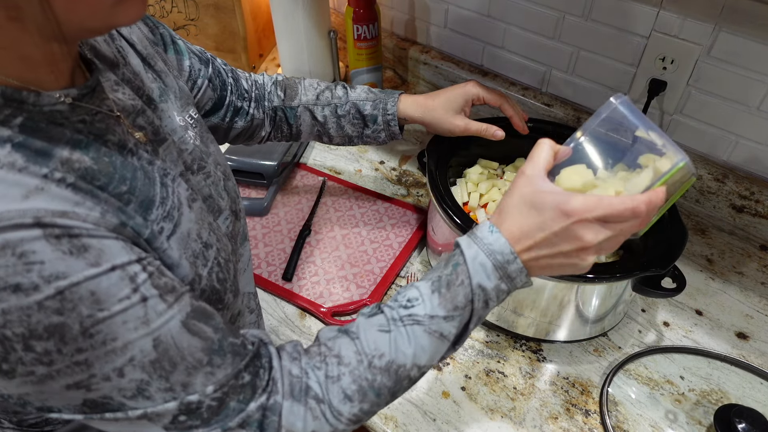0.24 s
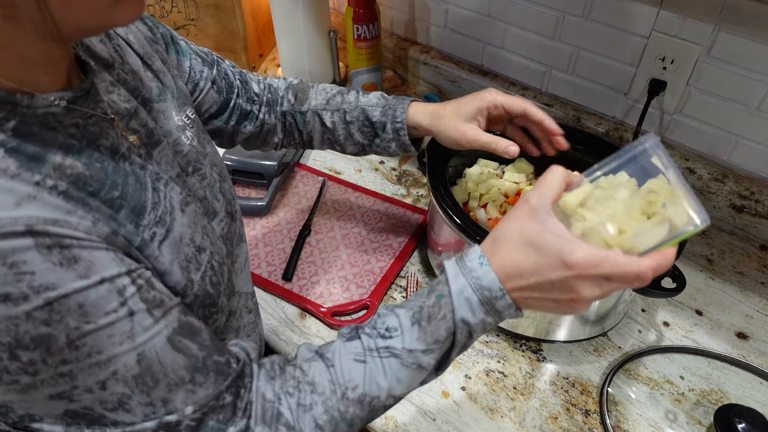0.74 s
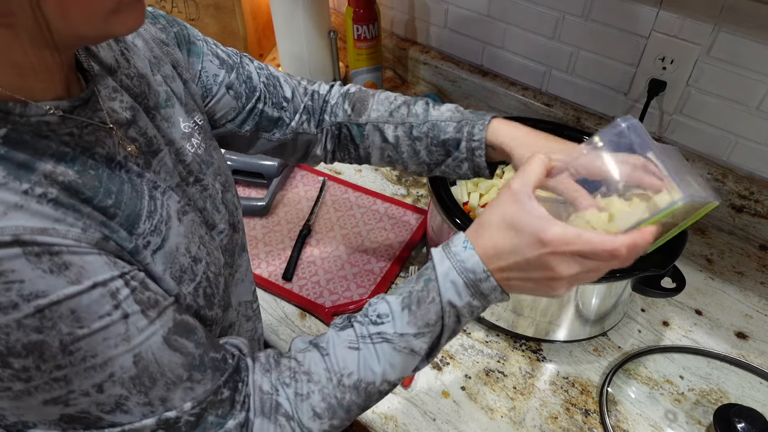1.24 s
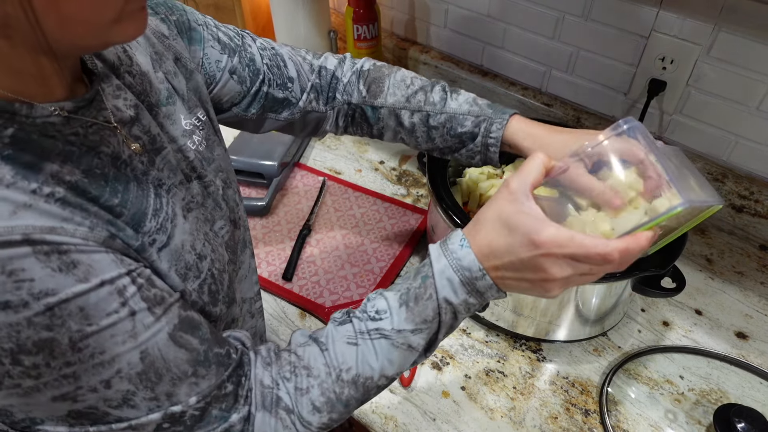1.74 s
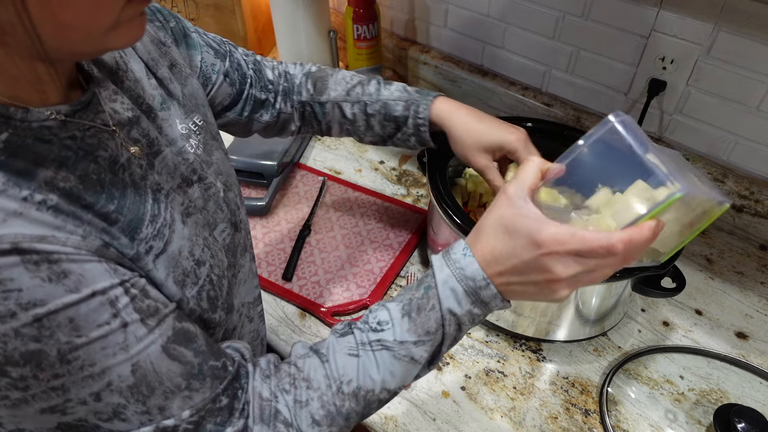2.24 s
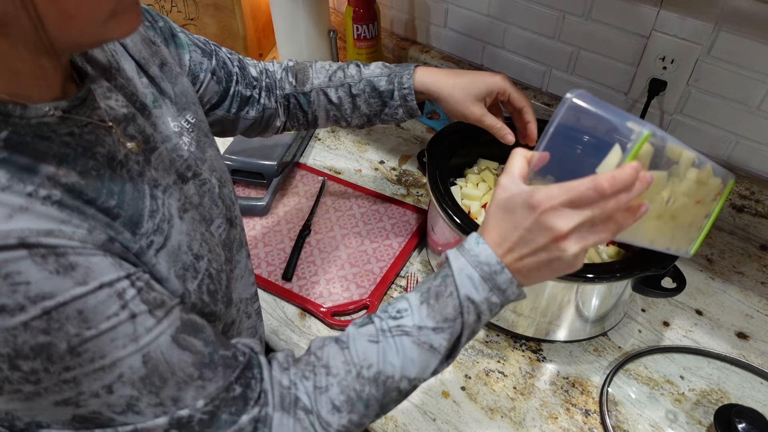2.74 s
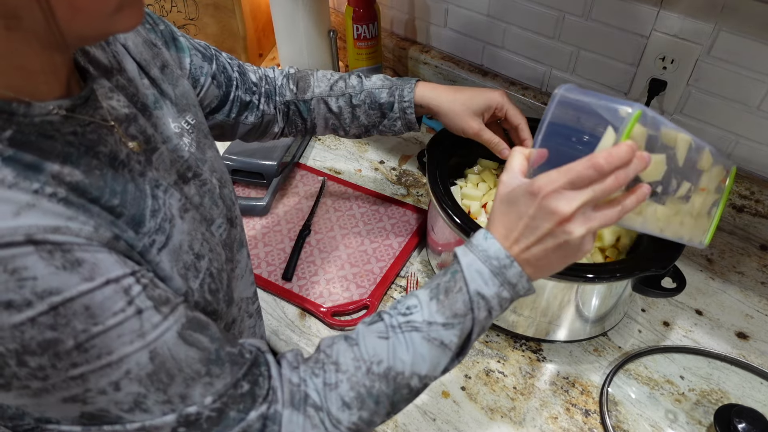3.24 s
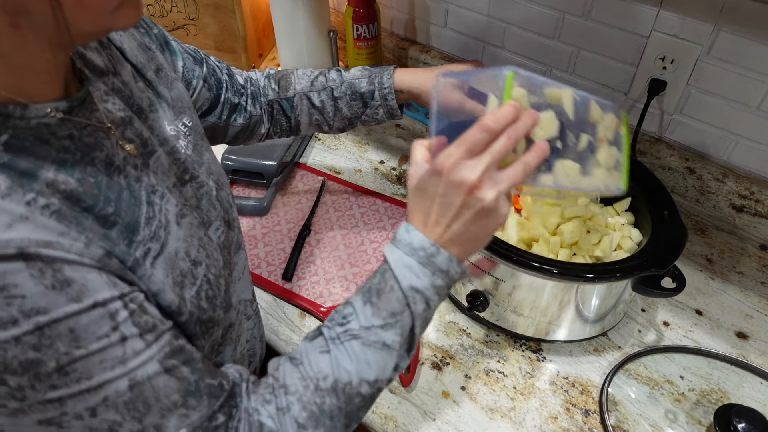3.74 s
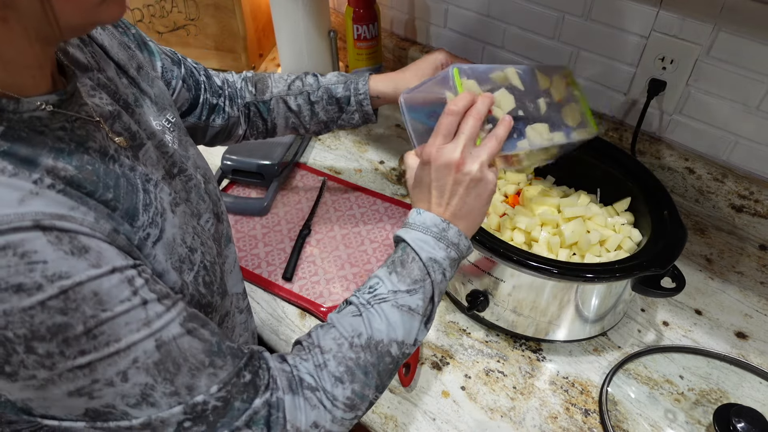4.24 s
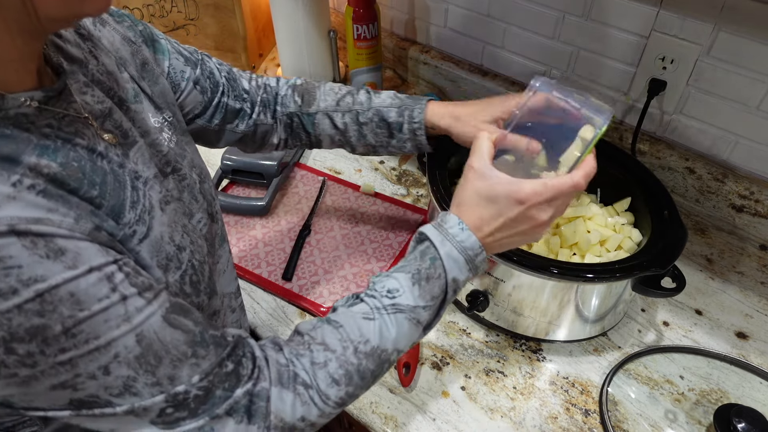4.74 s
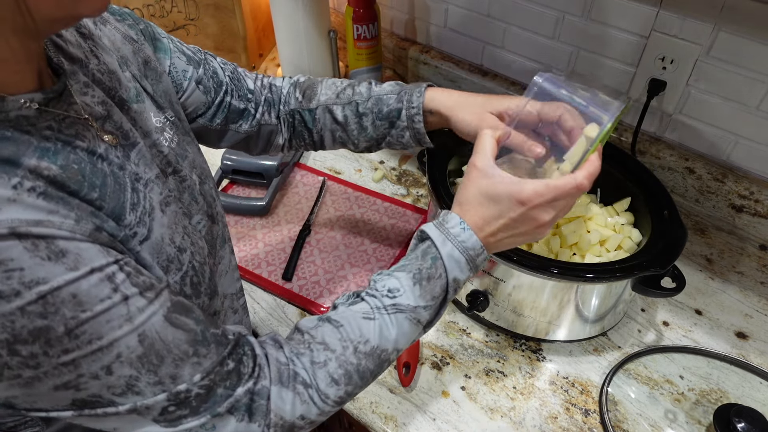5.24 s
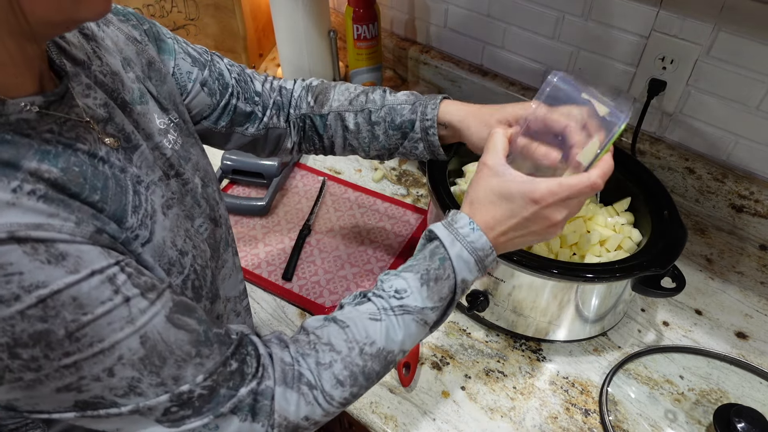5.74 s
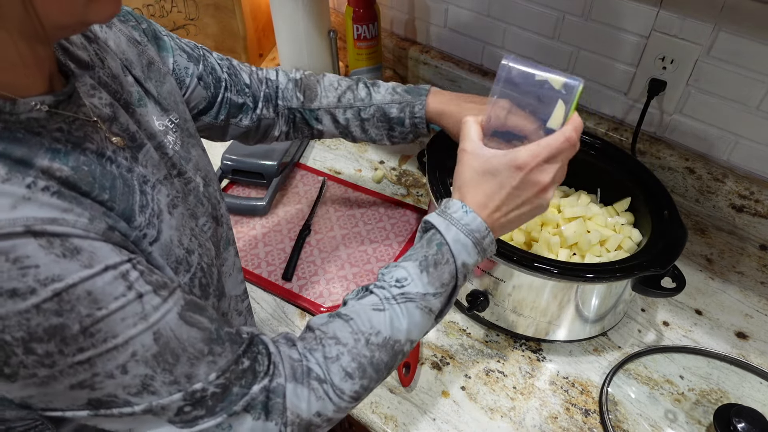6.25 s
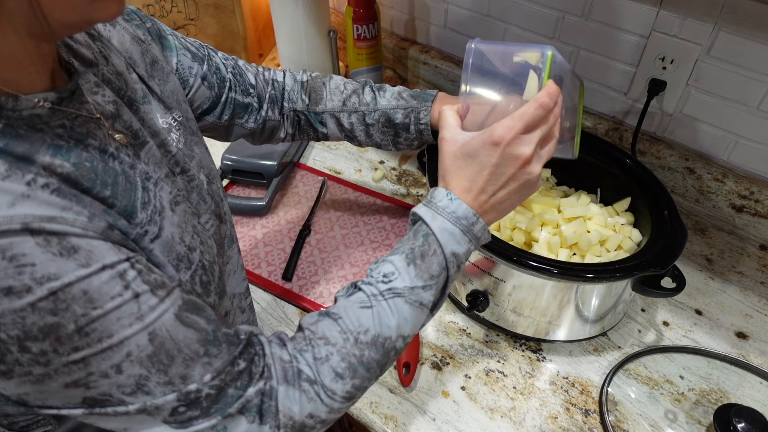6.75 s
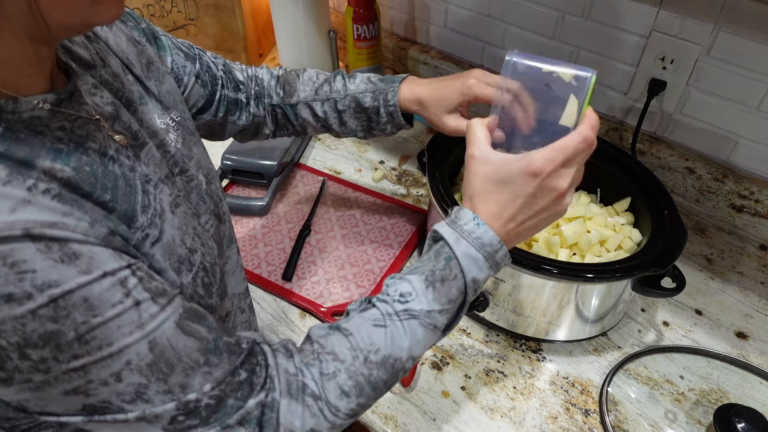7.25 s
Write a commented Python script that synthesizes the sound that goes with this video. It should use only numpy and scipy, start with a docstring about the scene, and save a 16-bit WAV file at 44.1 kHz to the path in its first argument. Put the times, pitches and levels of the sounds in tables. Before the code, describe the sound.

Hollow plastic knocks and soft, sticky rustling as potato cubes are emptied by hand from a box into a kitchen pot.

```python
"""Diced potato knocks and tumbles in a plastic box shaken over a pot; fingers scrape the last cubes out.
Each impact excites damped modes of the air in the box, its walls and its rim, and a tiled kitchen
reverberates. Wet cubes tick as they let go; sliding friction hisses and gripping skin squeaks.
Behind it all an appliance hums, air rushes and a low rumble comes and goes."""
import sys
import numpy as np
from scipy import signal
from scipy.fft import rfft, irfft, next_fast_len
from scipy.io import wavfile
from scipy.ndimage import map_coordinates

SR = 44100
rng = np.random.default_rng(int(sys.argv[2]) if len(sys.argv) > 2 else 0)


def dump(signal):
    """Clip the signal to [-1, 1] and save it as 16-bit WAV at the path in sys.argv[1]."""
    limited = np.clip(np.atleast_2d(signal).T, -1, 1)
    pcm = np.round(limited * 32767).astype(np.int16)
    wavfile.write(sys.argv[1], SR, pcm)


N = 330750


def amp(db):
    return 10 ** (np.asarray(db) / 20)


def unit(x):
    return x / np.sqrt(np.mean(x ** 2) + 1e-20)


def along(points, hz):
    """Interpolation of (frequency, value) points on a logarithmic axis."""
    f, v = np.transpose(points)
    return np.interp(np.log(hz + 1), np.log(f + 1), v)


def curves(rows):
    """Linear interpolation in time: one envelope for each column after the first."""
    s, *cols = np.transpose(rows)
    return [np.interp(np.arange(N) / SR, s, c) for c in cols]


def wobble(rate):
    """Random modulation: a spline through `rate` Gaussian knots a second."""
    return map_coordinates(rng.standard_normal(int(N * rate / SR) + 4), [np.arange(N) * rate / SR])


def filtered(x, response):
    """Linear filtering: the spectrum of x times a frequency response."""
    n = x.shape[-1]
    m = next_fast_len(n + 8192)
    return irfft(rfft(x, m) * response(np.fft.rfftfreq(m, 1 / SR)), m)[..., :n]


def stereo_noise(spectrum, coherence, grain=1):
    """Partial coherence: independent mid and side noises, modulated by grain, mix to rms 1."""
    def response(hz):
        angle = np.arccos(np.clip(along(coherence, hz), -1, 1)) / 2
        return amp(along(spectrum, hz)) * [np.cos(angle), np.sin(angle)]
    mid, side = filtered(grain * rng.standard_normal((2, N)), response)
    return unit(np.array([mid + side, mid - side]))


# Tones of the appliance: (frequency [Hz], level [dB])
HUM_TONES = [(119.5, -68), (395, -63.5)]
# Envelope of the rumble: (time [s], level [dB])
RUMBLE_LEVELS = [(0.0, -80), (0.04, -64), (0.23, -74), (0.88, -74), (1.27, -63), (1.38, -73), (2.36, -59),
                 (2.53, -80), (2.76, -57), (2.9, -74), (3.13, -62), (4.22, -73.5), (4.43, -65), (5.43, -82),
                 (6.5, -70), (7.5, -82)]
# Spectrum of the rushing air: (frequency [Hz], spectral density [dB])
AIR_SPECTRUM = [(35, -56), (60, -40), (149, -12), (227, -6.5), (281, -7.5), (398, -3.5), (427, -14.5),
                (469, -8), (732, -20.5), (1440, -22), (2470, -31), (3340, -34), (3940, -35), (5090, -37.5),
                (16000, -43)]
# Likeness of the rush in left and right: (frequency [Hz], coherence [ratio])
AIR_COHERENCE = [(60, 0.85), (150, 0.64), (500, 0.9), (1600, 0.14), (5000, 0.064), (8000, 0.7),
                 (11000, .998)]
def kitchen(air_db=-55):
    """Superposition: broadband air noise, a hum modulated in level and phase, and a low rumble."""
    t = np.arange(N) / SR
    hum = sum(amp(db + 2.8 * wobble(7.3)) * np.sin(2 * np.pi * hz * t + 0.51 * wobble(7.2))
              for hz, db in HUM_TONES)
    bass = [(25, -70), (36, -20), (48, 0), (65, -7), (80, -13), (105, -8), (140, -25), (220, -80)]
    rumble = stereo_noise(bass, coherence=[(50, .98)])
    air = amp(air_db + 0.8 * wobble(4.05)) * stereo_noise(AIR_SPECTRUM, AIR_COHERENCE)
    return air + hum + amp(curves(RUMBLE_LEVELS)[0] + 0.46 * wobble(2.42)) * rumble


# Faint rough squeaks: (time [s], level [dB], time to fall 20 dB [s], frequency [Hz])
SQUEAKS = [(0.25, -60.5, 0.079, 1500), (0.38, -67, 0.25, 1480), (0.46, -54.5, 0.18, 1450),
           (0.6, -69, .2, 1550), (0.76, -70.5, 0.23, 3350), (0.8, -64, 0.17, 1600),
           (0.88, -54.5, 0.094, 1545), (0.89, -59.5, 0.073, 3170), (0.955, -67, .06, 3130),
           (1.06, -66, .05, 3430), (1.96, -60, .1, 1500), (2.11, -60, 0.089, 1880), (4.314, -65, .04, 3300),
           (4.43, -66, 0.12, 3200), (6.97, -55, .05, 2860), (5.3, -57, 0.14, 1920)]
def squeaks(rise_s=0.053, width_hz=160):
    """Stick-slip friction: skin on the gripped plastic excites narrow noise bands at its resonances."""
    t = np.arange(N) / SR
    a, b = (unit(filtered(rng.standard_normal(N), lambda f: np.exp(-(f / width_hz) ** 2)))
            for _ in range(2))
    out = np.zeros(N)
    for s, db, fade_s, hz in SQUEAKS:
        envelope = amp(db - 1.5 - 20 * np.maximum((s - t) / rise_s, (t - s) / fade_s))
        out += envelope * (a * np.sin(2 * np.pi * hz * t) + b * np.cos(2 * np.pi * hz * t))
    return out


def crackle(per_s=1100, centre_hz=4800, octaves=2.6, spread_db=2.5):
    """Shot noise: a wet film lets go in short tone bursts of random time, pitch and size; rms 1."""
    when, pitch, size = rng.random((int(per_s * N / SR), 3)).T
    hz = np.clip(centre_hz * 2 ** (octaves * (pitch - .5)), 1500, 15000)[:, None]
    k = np.arange(SR // 70)
    strength = amp(-spread_db * np.log(size + .02))[:, None] * (4000 / hz) ** 1.8
    pops = strength * np.hanning(len(k)) * np.sin(2 * np.pi * hz * k / SR)
    samples = (when * N).astype(int)[:, None] + k
    return unit(np.bincount(samples.ravel(), pops.ravel())[:N])


def settling(relative_db=-24, t60=0.36, rise_s=0.018):
    """Incoherent addition: the jostling after each knock sums in power to one amplitude envelope."""
    power, t = np.zeros(N + SR), np.arange(SR) / SR
    for s, db, *_ in KNOCKS:
        jostle = amp(db + relative_db - 60 * t / t60) * (1 - np.exp(-t / rise_s))
        power[round(s * SR):][:SR] += jostle ** 2
    return np.sqrt(power[:N])


# Envelopes of the sliding: (time [s], tumble level [dB], hiss level [dB])
SLIDE_LEVELS = [(0.0, -60, -70), (0.21, -56, -72.5), (0.77, -64, -73), (1.15, -57, -65), (1.33, -69, -57),
                (1.63, -55, -66), (1.86, -55.5, -68.5), (2.21, -49, -64), (2.46, -58.5, -71),
                (2.86, -60.5, -73.5), (3.26, -50.5, -67), (3.99, -65, -72), (4.55, -52.5, -70.5),
                (4.8, -53, -69.5), (4.89, -47.5, -63), (5.02, -56, -67), (5.09, -54, -60.5),
                (5.33, -55.5, -68.5), (5.58, -55, -60.5), (5.74, -56, -60.5), (5.87, -55, -57.5),
                (6.04, -52.5, -59), (6.25, -55, -65), (6.62, -61, -71.5), (6.72, -67, -56),
                (6.85, -56, -61.5), (6.97, -56, -59.5), (7.08, -54.5, -64.5), (7.2, -58, -71.5),
                (7.33, -63, -74.5), (7.4, -61, -64.5), (7.5, -51, -63)]
# Spectrum of jostling cubes: (frequency [Hz], spectral density [dB])
TUMBLE_SPECTRUM = [(60, -38), (130, -6), (200, -4), (400, -4.5), (550, 2.5), (800, 0.5), (1200, -7),
                   (1600, -3.5), (2200, -15.5), (3500, -28.5), (6000, -46)]
# Spectrum of wet skin on plastic: (frequency [Hz], spectral density [dB])
HISS_SPECTRUM = [(1200, -13), (2500, 5), (3500, 3), (6000, 1), (9000, -6), (12000, -12.5), (16000, -14.5)]
def slide(film_db=-1.5):
    """Friction noise: small cubes jostle in coarse lumps; wet skin on plastic hisses in fine grains."""
    tumble_db, hiss_db = curves(SLIDE_LEVELS)
    lumps = amp(2.5 * wobble(60))
    tumble = stereo_noise(TUMBLE_SPECTRUM, [(100, 0.84), (500, 0.79), (2000, 0.81)], lumps)
    grains = amp(0.63 * wobble(200) + 2.5 * wobble(25))
    hiss = stereo_noise(HISS_SPECTRUM, [(3000, 0.91), (7000, 1.0), (11000, .998)], grains)
    wet_hiss = hiss + amp(film_db) * crackle()
    return np.hypot(amp(tumble_db), settling()) * tumble + amp(hiss_db) * wet_hiss


# Decay of the tiled kitchen: (frequency [Hz], reverberation time T60 [s])
ROOM_T60 = [(200, 0.29), (600, 0.48), (2000, 0.39), (5000, 0.44), (12000, 0.062)]
# Difference between left and right in the room: (frequency [Hz], side over mid amplitude [ratio])
ROOM_WIDTH = [(200, 0.057), (1000, 0.25), (4000, 0.13), (9000, 0.094), (14000, .04)]
def reverberation(sound):
    """Convolution with a diffuse tail: noise in which each frequency decays at its own rate."""
    hz, t, noise = signal.stft(rng.standard_normal((2, SR // 2)), SR, nperseg=256)
    mid, side = noise * amp(-60 * t / along(ROOM_T60, hz)[:, None])
    side = side * along(ROOM_WIDTH, hz)[:, None]
    tail = signal.istft(np.array([mid + side, mid - side]), SR, nperseg=256)[1]
    delayed = np.pad(sound, (220, 0))  # 5 ms
    return signal.fftconvolve(delayed[None], tail / np.linalg.norm(tail[0]), axes=1)


# Spectrum common to all ticks: (frequency [Hz], spectral density [dB])
TICK_SPECTRUM = [(1500, -1.5), (3000, 8), (6000, 1.5), (10000, -6), (13000, -18), (16000, -20)]
# Sticky ticks: (time [s], peak level [dB], tail T60 [s], lower resonance [Hz], its strength [dB],
# upper resonance [Hz], its strength [dB], tilt [dB/octave])
TICKS = [(0.0203, -31.5, 0.18, 3700, 6.7, 5510, 4.7, -4), (1.0084, -44.5, 0.15, 3190, 3.4, 7020, 2, 3),
         (1.06, -48, 0.13, 3380, 5, 5640, 3, 1), (1.1462, -33, 0.32, 3370, 6.6, 5490, 3.1, 0.5),
         (1.2695, -36, 0.23, 3460, 10, 6340, 3.5, -1), (1.43, -44.5, 0.1, 3470, 4.2, 6390, 2, 8),
         (1.4544, -52, 0.14, 3030, 5, 8560, 4, 9), (1.496, -46, 0.15, 4210, 3.6, 6170, 2, 5),
         (1.783, -52.5, 0.13, 4700, 4.3, 8600, 2, 8), (1.879, -57, 0.12, 4010, 5, 5660, 6, 0),
         (1.9604, -50, 0.12, 3010, 4.1, 5890, 2, 3), (2.0223, -48.5, 0.14, 3120, 4.1, 5880, 4.3, 3),
         (2.0702, -38.5, 0.072, 3420, 6, 5900, 6, -5.5), (2.089, -50.5, 0.3, 3370, 4.6, 5870, 4, 8),
         (2.1857, -45, 0.074, 3530, 6.9, 6600, 6, -3), (2.2184, -47, 0.065, 3600, 4.5, 6700, 3, 8),
         (2.2704, -36, 0.23, 3420, 6.9, 6400, 3.2, -4), (3.054, -50, 0.2, 2950, 3.6, 5250, 2, 4),
         (3.1128, -50, 0.23, 3030, 4.2, 5280, 2, 4), (3.1363, -47, 0.12, 3690, 4, 5260, 2, 4),
         (3.152, -44, 0.25, 4800, 5.8, 7290, 4, 2.5), (3.2276, -38, 0.19, 3530, 5.6, 7260, 2, -1.5),
         (3.899, -56.5, 0.12, 5010, 4.6, 5330, 3, -3.5), (4.3108, -49, 0.34, 3350, 6, 9600, 6.9, 8),
         (4.5223, -33, 0.25, 3200, 9.4, 5260, 2.1, -1), (4.835, -50, 0.12, 3200, 5, 5630, 7, -4),
         (4.8482, -41, 0.26, 3300, 3.7, 6200, 2, 0.5), (4.882, -39, 0.14, 3460, 5, 6240, 6, -4),
         (4.8993, -43.5, 0.14, 3420, 5, 6000, 6, -3), (4.9472, -40, 0.17, 3080, 3.8, 6440, 2, -1.5),
         (5.043, -50, 0.18, 4980, 5, 6430, 5.3, -3), (5.0649, -43.5, 0.17, 4970, 5, 5720, 4.3, 0),
         (5.1166, -43.5, 0.11, 4350, 6.5, 5770, 4.8, -3), (5.211, -53, 0.19, 3170, 3.9, 7650, 3, 4),
         (5.275, -54, 0.12, 4110, 4.3, 8570, 13, 4), (5.3812, -41.5, 0.056, 3540, 7.2, 5100, 10, -4),
         (5.457, -40, 0.086, 3060, 5.4, 5370, 6, -2), (5.578, -48, 0.16, 3400, 4.1, 5310, 2, -2),
         (5.664, -44, 0.062, 4250, 7.2, 5960, 5.4, -2), (5.791, -47, 0.068, 3480, 5, 5690, 6, -3),
         (5.852, -47, 0.069, 3480, 5, 6070, 8, 0), (5.8843, -35, 0.11, 3510, 8.4, 5200, 3.3, 0),
         (5.8968, -38.5, 0.078, 3670, 5, 6000, 5.4, 5), (6.0544, -51, 0.14, 3480, 5, 5960, 6, 3),
         (6.172, -51, 0.12, 4130, 5, 5650, 6, -2), (6.1968, -45, 0.091, 4090, 5, 6050, 5, 2.5),
         (6.506, -48.5, 0.13, 3820, 10, 5900, 5.6, 1), (6.636, -27, 0.18, 3820, 2.7, 6660, 2.8, -0.5),
         (6.6482, -34, 0.1, 3720, 5, 6700, 3.2, 6), (6.6603, -28, 0.13, 3820, 4.1, 6260, 8.6, 1),
         (6.678, -35.5, 0.28, 3770, 5, 6200, 7, 2), (6.736, -39.5, 0.14, 3650, 5, 6170, 3, -1),
         (6.8242, -43.5, 0.15, 3170, 7.3, 5800, 3.3, 4), (6.8836, -43, 0.06, 3750, 5, 5890, 4.6, 0),
         (6.943, -58, 0.29, 4350, 4.1, 5850, 10, 3), (7.0192, -35.5, 0.072, 2940, 2.9, 6200, 3.4, -1),
         (7.3467, -37, 0.21, 3850, 12, 5920, 4.2, -1.5), (7.3548, -39, 0.11, 3070, 5, 5500, 6, -2)]
def ticks(half_width_hz=260):
    """Release of adhesion: a wet cube lets go in a bright noise burst with two resonance peaks."""
    out, t = np.zeros((2, N + SR)), np.arange(SR // 4) / SR
    f = np.fft.rfftfreq(len(t), 1 / SR)
    grain = amp(0.8 * wobble(150))[:N - len(t)]
    for s, db, t60, *resonances, tilt_db in TICKS:
        peaks = sum(amp(peak_db) / (1 + ((f - hz) / half_width_hz) ** 2)
                    for hz, peak_db in np.reshape(resonances, (2, 2)))
        colour = amp(along(TICK_SPECTRUM, f) + tilt_db * np.log2((f + 1) / 5000)) * (1 + peaks)
        spectra = rfft(rng.standard_normal((2, len(t)))) * colour
        mid, side = irfft(spectra * [np.ones_like(f), along(ROOM_WIDTH, f)], len(t))
        fade = amp(-60 * t / 0.014) + 0.5 * amp(-60 * t / np.clip(t60, .02, .4))
        lumps = grain[rng.integers(len(grain) - len(t)):][:len(t)]
        puff = fade * lumps * (1 - np.exp(-t / 0.00081)) * np.array([mid + side, mid - side])
        peak = 3 * np.std(puff[:, :SR // 100])  # about three times the rms
        out[:, round(s * SR):][:, :len(t)] += amp(db) * puff / peak
    return out[:, :N]


# Normal modes of the box: (frequency [Hz], level [dB], decay time T60 [s])
BOX_MODES = [(159, -6, 0.054), (187, 5.5, 0.073), (400, -7.5, 0.02), (493, 3.5, 0.036), (555, 1.5, 0.031),
             (640, -10.5, 0.033), (710, 0, 0.054), (820, -1, 0.041), (903, 2.5, 0.016), (988, 1, 0.021),
             (1017, -2, 0.012), (1130, 2.5, 0.03), (1251, -0.5, 0.034), (1410, -4.5, 0.017),
             (1484, 2.5, 0.015), (1671, -3, 0.031), (1792, -7.5, 0.018), (1901, -5, 0.043),
             (2120, 3, 0.021), (2280, 0, 0.022), (2450, -1, 0.021), (2670, 0.5, 0.015), (3030, -2.5, 0.014),
             (3420, -4, 0.023), (3800, -10.5, 0.016), (4030, -4, 0.023), (4790, -3.5, 0.0082),
             (5300, -8, 0.005), (6240, -8, 0.0087)]
PART_EDGES_HZ = [300, 600, 2010]  # between thump, air cavity, walls and rim
WALL_BELOW, WALL_ABOVE, RIM_SLOPE = 9, 7, 16.5  # dB per octave away from the loudest pitch
PUSH_MS, AIR_SWELL_MS = 2.21, 4.3
def box_ring(thump_db, dent_db, wall_hz, air_db, air_hz, rim_db, rim_hz):
    """Modal superposition: a soft cube pushes for a moment, so the damped modes swell, then decay."""
    hz, db, t60 = np.transpose(BOX_MODES)[:, :, None]
    t = np.arange(SR // 10) / SR
    scatter, detune, phase = rng.standard_normal((3, len(BOX_MODES), 1))
    part = np.searchsorted(PART_EDGES_HZ, hz)
    air, wall, rim = part == 1, part == 2, part == 3
    hz = np.where(air, hz * air_hz / 500, hz)  # the cavity changes with the heap and the hand
    softness = 2.16 * np.clip(air_db - 1.5, 0, 15)  # a blow that mostly pumps the air is duller
    wall_slope = np.where(hz < wall_hz, WALL_BELOW, WALL_ABOVE + softness)
    wall_loss = wall * wall_slope * abs(np.log2(hz / wall_hz))
    rim_loss = rim * RIM_SLOPE * abs(np.log2(hz / rim_hz))
    level = db - wall_loss - rim_loss + 1.2 * scatter
    phase_spread = .25 + 3 * np.clip(hz / 4000, 0, 1)  # short waves depend most on the spot struck
    waves = np.sin(2 * np.pi * hz * (1 + .007 * detune) * t + phase_spread * phase)
    swell = np.sin(np.pi / 2 * np.clip(t * 1000 / np.where(air, AIR_SWELL_MS, PUSH_MS), 0, 1)) ** 2
    first_swing = 1 + amp(-5 - 60 * t / 0.024)  # quickly damped by the hand
    modes = amp(level - 60 * t / t60) * first_swing * waves * swell
    dent = amp(dent_db - 60 * t / 0.01) * np.sin(2 * np.pi * wall_hz * t)  # the struck spot pops
    modes[np.argmin(abs(hz - wall_hz))] += dent * swell[-1]
    parts = np.array([modes[part[:, 0] == k].sum(axis=0) for k in range(4)])
    parts /= abs(parts).max(axis=1, keepdims=True)
    thump, *body = parts * amp([[thump_db], [air_db], [0], [rim_db]])
    radiation = signal.butter(3, 300, "highpass", fs=SR, output="sos")  # a small box radiates little bass
    return thump * (1 - np.exp(-t / 0.00063)) + signal.sosfilt(radiation, sum(body))


# Impacts of cubes and fingers: (time [s], wall level [dB], loudest wall pitch [Hz], cavity re walls [dB],
# cavity pitch [Hz], rim re walls [dB], loudest rim pitch [Hz], room re direct sound [dB])
KNOCKS = [(0.02, -18, 757, -9.5, 400, -12.5, 3530, -3.5), (0.867, -37, 1270, -16, 406, -9, 2730, -7.5),
          (1.006, -55, 681, -18, 395, 7, 2730, 4), (1.046, -40.5, 1160, -8, 466, -16, 2390, -3),
          (1.06, -37.5, 1290, -21, 388, -6, 2150, -13), (1.143, -8.5, 1055, -33, 640, -15, 3430, -1),
          (1.267, -6, 1130, -47, 516, -20, 3430, -7), (1.355, -27.5, 940, -28, 615, -28, 2100, -1),
          (1.399, -19.5, 995, -13.5, 550, -13.5, 3420, -7), (1.485, -21, 930, -35, 570, -25, 3420, -7),
          (1.561, -28, 920, -50, 649, -18, 2080, -3.5), (1.77, -38, 690, -18, 640, -28, 2250, 1),
          (1.911, -31, 690, 2.5, 523, -19, 2520, -8.5), (2.022, -40.5, 1510, 2.5, 373, -6, 2170, -7),
          (2.073, -29.5, 1880, -7, 537, -16, 3500, -3.5), (2.272, -16.5, 786, 1, 525, -12, 3410, -9),
          (2.59, -47, 807, 9.5, 515, -21, 2280, -6), (2.732, -29.5, 820, -1, 520, -20.5, 3390, -8),
          (2.783, -39.5, 754, 2, 527, -27, 2360, -7), (2.974, -32, 795, -1, 550, -16, 2140, -8),
          (3.031, -43, 770, 2.5, 416, -22, 2200, -8), (3.06, -33, 930, -9, 458, -23, 2260, -18),
          (3.082, -39, 885, 4, 544, -12, 2140, -1), (3.228, -23.5, 800, 1, 525, -7.5, 2110, -10),
          (3.271, -41, 800, -14, 530, -20, 2190, -10), (3.384, -42, 750, 11, 490, -25, 2050, -8),
          (3.393, -36.5, 1290, -0.5, 554, -34, 2050, -8.5), (3.448, -45.5, 783, 12.5, 513, -23, 2180, -25),
          (3.497, -39.5, 1240, -1.5, 475, -31, 2270, -5), (3.531, -48.5, 806, 6.5, 552, -18, 2240, 2.5),
          (3.563, -40.5, 1320, -3, 553, -10.5, 2050, -4), (4.039, -46, 1070, 4.5, 547, -24.5, 2090, -5),
          (4.191, -41.5, 1130, -2, 400, -17, 2540, -1.5), (4.305, -38, 744, 2.5, 536, -19, 3260, 4.5),
          (4.336, -40.5, 713, 15.5, 550, -22, 2160, -6), (4.519, -11.5, 1060, 4.5, 500, -19.5, 2290, -10),
          (4.663, -36.5, 850, 3.5, 400, -12, 2130, -3.5), (4.741, -39.5, 800, 2.5, 525, -27, 2190, -16),
          (4.811, -38, 707, -16, 640, -27, 2500, -4), (4.849, -32.5, 750, -29, 650, -11, 2120, -2),
          (4.88, -32.5, 1140, -17, 426, -11, 2520, -4), (4.948, -38, 745, -1, 430, -5.5, 2290, 1),
          (5.063, -37.5, 1630, -18, 400, -3.5, 2190, 0), (5.119, -28, 1240, -27, 497, -7, 2160, -9.5),
          (5.248, -39, 714, -23, 404, -31, 2450, -17), (5.32, -48.5, 713, 4, 680, -22, 2050, -5),
          (5.384, -33.5, 1670, -12, 460, -3, 2080, -7), (5.458, -30.5, 710, -6.5, 657, -9, 2170, -8),
          (5.521, -40.5, 728, -41, 650, -8, 2130, 3), (5.663, -49, 750, -1, 555, 3.5, 2230, 2.5),
          (5.833, -34.5, 1300, -30, 640, -17, 2060, 0.5), (5.851, -43, 755, 4, 520, -1, 2180, -9),
          (5.872, -34.5, 700, 1, 543, -23, 2210, -7), (5.886, -36.5, 786, -28, 616, -11, 3480, -3),
          (5.901, -33.5, 770, -29, 543, -8, 2180, -23), (5.963, -41, 1200, -12, 610, -17, 2100, -9),
          (6.053, -44, 738, -13, 540, 1, 2270, -16), (6.077, -40.5, 681, 3, 530, -13, 3540, -6),
          (6.105, -42.5, 681, 1, 645, -14, 2180, -7), (6.127, -35, 750, -23, 660, -9, 2180, -4.5),
          (6.17, -37, 1120, -2.5, 514, -1.5, 2180, -6.5), (6.195, -47.5, 721, -20, 640, 6, 2240, -4),
          (6.638, -26, 664, -4.5, 577, 0.5, 2430, -4.5), (6.65, -23, 1600, -26, 640, -4, 2420, -3.5),
          (6.661, -28, 1160, -5, 560, 7.5, 2440, -7.5), (6.678, -25.5, 1140, -1, 560, -4.5, 2400, -8),
          (6.698, -29, 760, -7, 570, -6, 2400, -4.5), (6.736, -44, 1780, -30, 553, 7, 2200, 5),
          (6.759, -45, 1940, -24, 640, 1, 2360, 2), (6.79, -33, 1200, -20, 595, -10, 2300, -3),
          (6.887, -39, 720, -8, 630, 0.5, 2440, -8), (7.019, -27.5, 1120, -1.5, 640, -2, 2220, -7.5),
          (7.344, -30.5, 740, -3, 382, -11, 2320, 2), (7.353, -24, 1040, -10, 366, -10, 2250, -4.5)]
def knocks(pan_db=-1):
    """Impact excitation: every blow rings the same box, but where it lands decides which part speaks."""
    out = np.zeros((2, N + SR))
    for s, db, *timbre, room_db in KNOCKS:
        thump_db = -31 - 0.14 * db  # re the walls: the thump grows more slowly than the knock
        dent_db = 10 + 0.16 * (db + 21)  # harder blows pop more
        blow = amp(db) * box_ring(thump_db, dent_db, *timbre)
        sound = amp(room_db) * reverberation(blow)
        sound[:, :len(blow)] += blow * amp([[pan_db / 2], [-pan_db / 2]])
        out[:, round(s * SR):][:, :sound.shape[1]] += sound
    return out[:, :N]


def scene():
    """Linear superposition: the pressures of all sources add in two channels."""
    return knocks() + ticks() + slide() + squeaks() + kitchen()


# Bass roll-off: (frequency [Hz], gain [dB])
LOW_CUT = [(15, -53), (30, -25), (45, -16.5), (70, 0)]
# Imbalance of the two microphone ports: (frequency [Hz], left minus right [dB])
PORT_IMBALANCE = [(30, 4.5), (250, 0.3), (600, .6), (1000, -0.5), (5000, -0.8), (9000, -0.8), (12000, 0.5)]
def record(dry, top_hz=15830):
    """Band limiting: two slightly unequal channels lose the lowest bass and all above top_hz."""
    def response(hz):
        gain_db = along(LOW_CUT, hz) + [[.5], [-.5]] * along(PORT_IMBALANCE, hz)
        return amp(gain_db) * (hz < top_hz)
    return filtered(dry, response)


dry = scene()
out = record(dry)
dump(out)
```